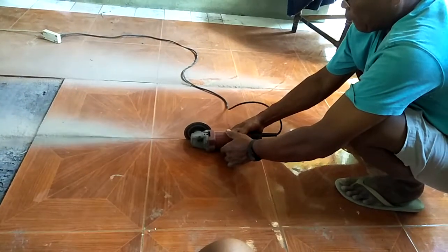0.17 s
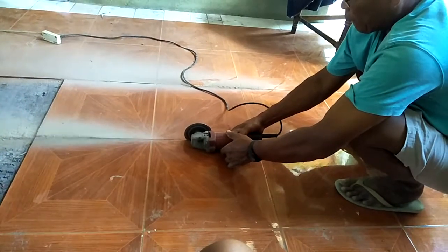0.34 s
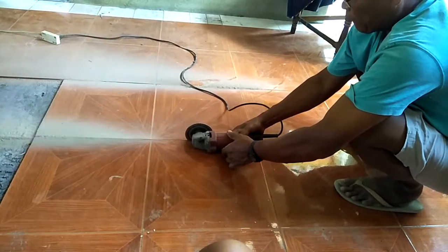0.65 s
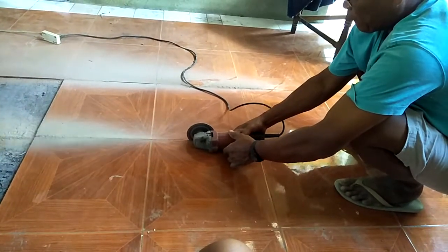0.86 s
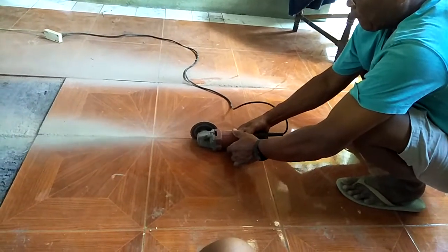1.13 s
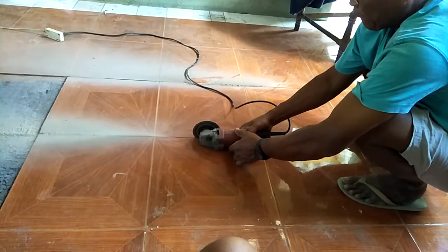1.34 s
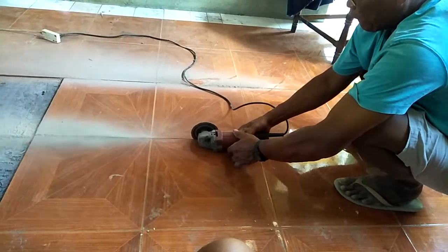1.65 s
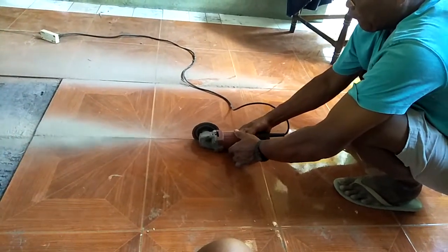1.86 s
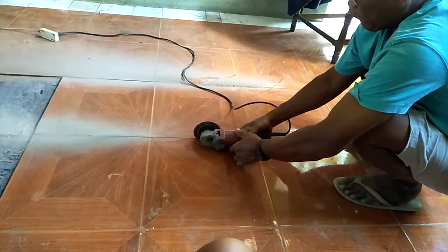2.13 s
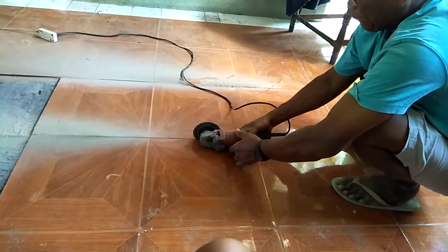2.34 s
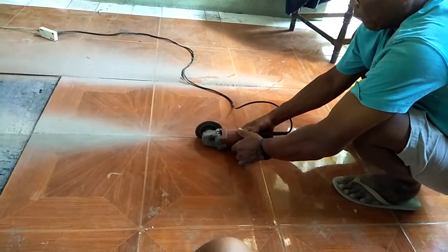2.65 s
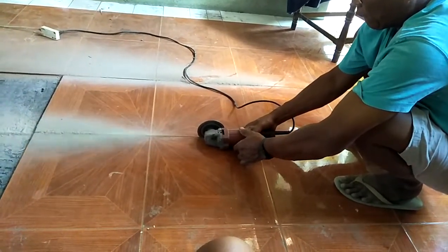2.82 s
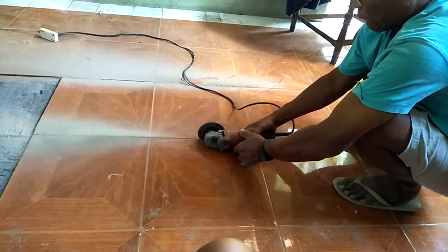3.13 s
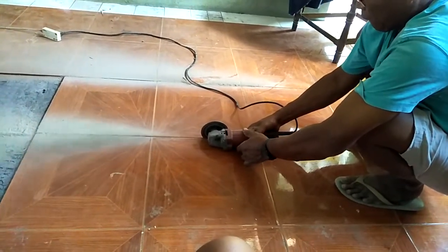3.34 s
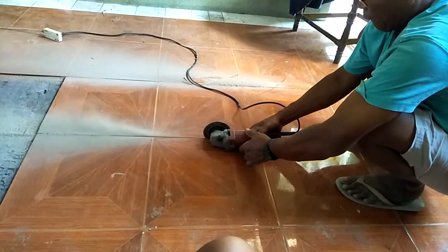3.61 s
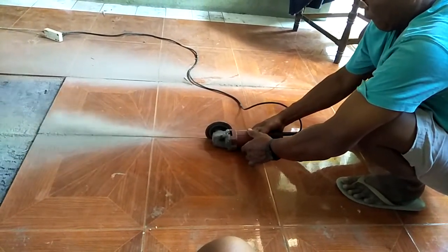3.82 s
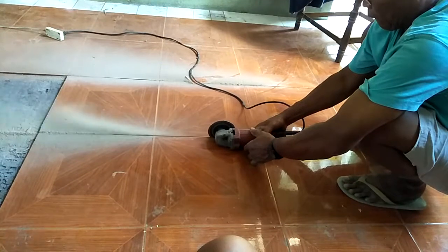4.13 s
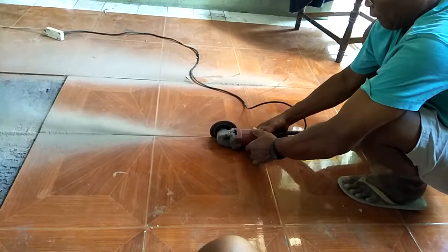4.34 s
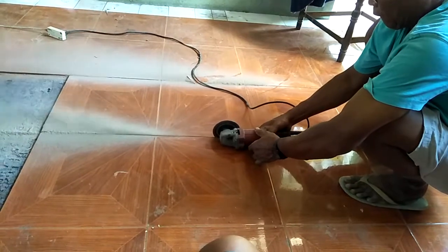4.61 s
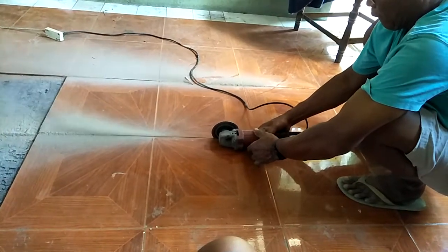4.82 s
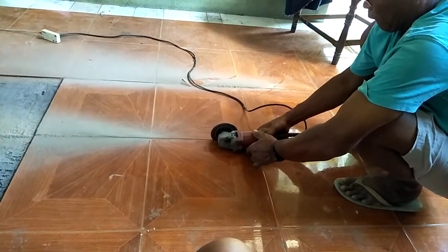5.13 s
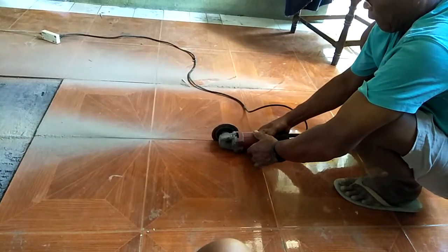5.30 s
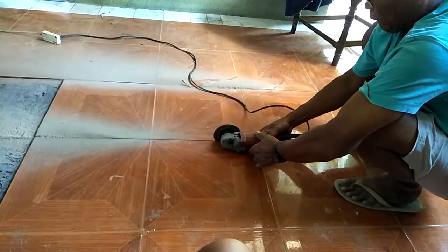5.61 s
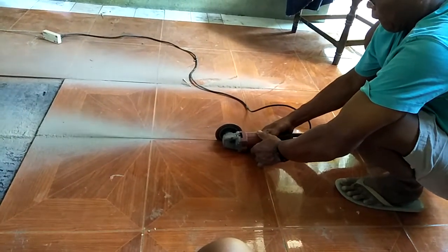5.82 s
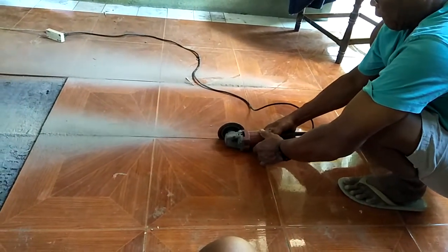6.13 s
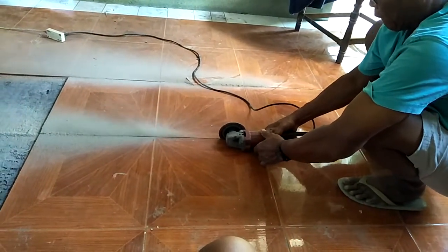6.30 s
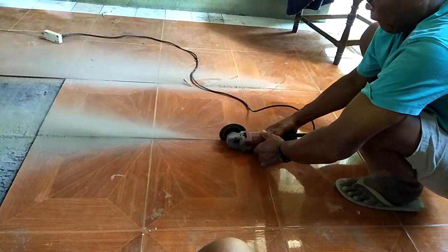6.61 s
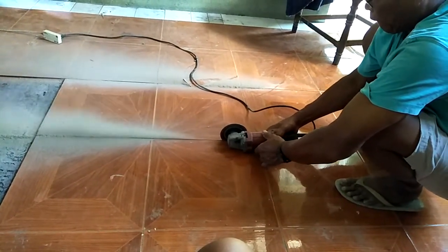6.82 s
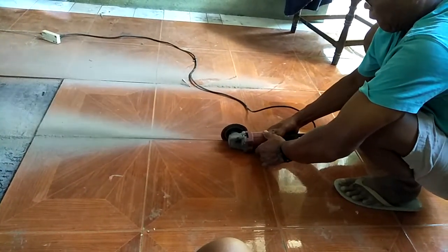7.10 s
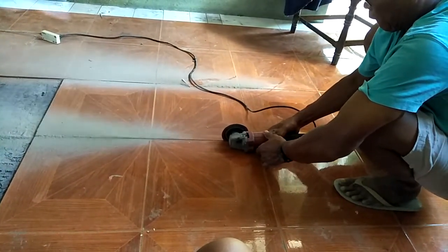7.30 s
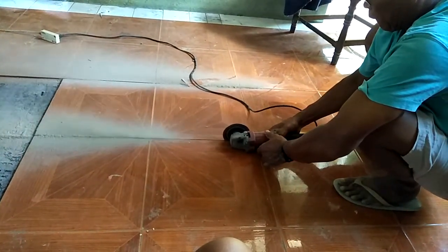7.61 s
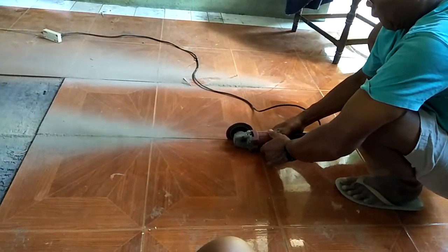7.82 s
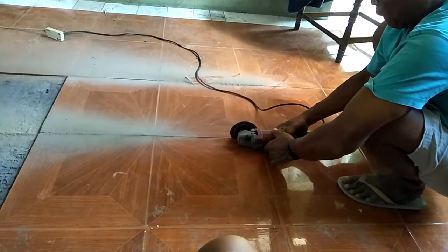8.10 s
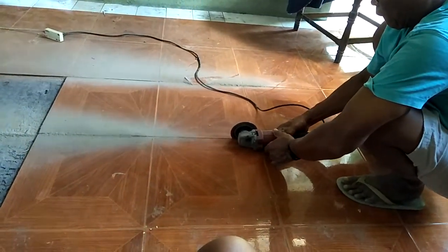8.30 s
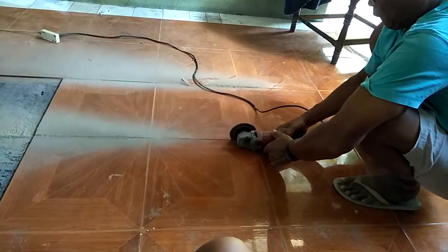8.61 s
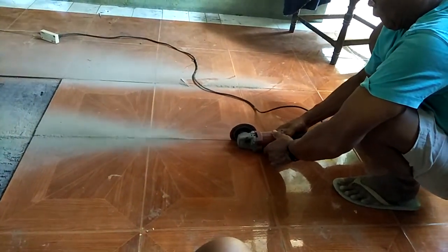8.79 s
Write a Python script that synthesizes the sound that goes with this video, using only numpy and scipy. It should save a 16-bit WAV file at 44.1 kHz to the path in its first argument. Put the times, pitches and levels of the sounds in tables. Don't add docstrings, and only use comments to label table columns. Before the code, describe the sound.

From 0 seconds a handheld angle grinder is at full work, its disc scraping grout between ceramic tiles in a bare room. The sound is dense, harsh and bright: a gritty rasp with rapid buzzing roughness, ringing tile and metal guard, a shrill wavering whine, broad hiss of fan air and dust, and a faint low motor hum and shudder. The whine swells around 1, 1.75 and 3.75 seconds as small pressure changes make the rasp surge and dip. From about 2 to 6 seconds the pitch gradually sags under load, with flutters near 5. At roughly 6.1 to 6.5 the disc skips out with a low jolt and rattle, dips and revs sharply higher, then settles back by 7. Steady cutting continues to about 9 seconds, more metallic, with whines near 7.8 and 8.65 and small bumps, still running at the end. Close microphone, short hard-wall reverberation.

```python
import sys
import numpy as np
from scipy import signal
from scipy.fft import rfft, irfft, next_fast_len
from scipy.io import wavfile

SR = 44100
rng = np.random.default_rng(int(sys.argv[2]) if len(sys.argv) > 2 else 0)


def dump_mix(stems):
    frames = np.atleast_2d(stems).T
    limited = np.clip(frames, -1, 1)
    pcm = np.round(limited * 32767).astype(np.int16)
    wavfile.write(sys.argv[1], SR, pcm)


def ratio(d):
    e = np.asarray(d, float) / 20
    return 10 ** e


N = 394694
TIME_S = np.arange(N) / SR
SLOW_S = np.arange(0, N + 64, 64) / SR
SIZE = next_fast_len(N + SR)
HZ = np.fft.rfftfreq(SIZE, 1 / SR)


def rms_one(x):
    return x / np.sqrt(np.mean(x ** 2) + 1e-20)


def in_time(rows):
    s, *columns = np.transpose(rows)
    return [np.interp(TIME_S, s, column) for column in columns]


def smooth(slow):
    return np.interp(TIME_S, SLOW_S, slow)


def swells(rows):
    return smooth(sum(height * np.exp(-2 * ((SLOW_S - s) / length_s) ** 2) for s, height, length_s in rows))


def drift(rate_hz):
    hop = 40
    r = np.exp(-2 * np.pi * rate_hz * hop / SR)
    noise = rng.standard_normal(N // hop + 2002)
    slow = signal.lfilter([1], [1, -2 * r, r * r], noise)[2000:]
    return np.interp(np.arange(N) / hop, np.arange(len(slow)), rms_one(slow))


def coloured(x, spectrum):
    hz, db = np.transpose(spectrum)
    gain = ratio(np.interp(np.log(HZ + 1), np.log(hz), db))
    return rms_one(irfft(rfft(x, SIZE) * gain, SIZE)[:N])


def ring(force, modes, wander_db, order=1):
    out = np.zeros(N)
    for k, (hz, width, db) in enumerate(modes):
        r = np.exp(-np.pi * width * np.sqrt(order) / SR)
        zeros = [(1 - r * r) / 2, 0, (r * r - 1) / 2]
        poles = [1, -2 * r * np.cos(2 * np.pi * hz / SR), r * r]
        tone = force * ratio(db + wander_db * drift(1.5))
        for _ in range(order):
            tone = signal.lfilter(zeros, poles, tone)
        out += tone * (-1) ** k
    return rms_one(out)


# t/s, rate/turns per s
DISC_SPEED = [(0, 141), (1.0, 143), (1.75, 143.2), (2.0, 141.8), (2.75, 141.4), (3.0, 139.4), (3.75, 138.6),
              (4.0, 136.4), (5.2, 134.1), (5.75, 130.7), (6.05, 130.6), (6.36, 151.5), (6.56, 149),
              (6.85, 139), (7.25, 134.6), (7.75, 137.2), (8.65, 131.1), (8.95, 133.3)]


def disc_speed():
    return in_time(DISC_SPEED)[0]


# t/s, change of contact force/dB, length/s
HAND_NUDGES = [(0.56, 2.5, 0.41), (0.87, 0.5, 0.075), (0.997, -1.9, 0.078), (1.248, 1.8, 0.15),
               (1.38, -4.5, 0.056), (2.248, -2.3, 0.067), (2.675, 1.7, 0.4), (3.17, -2.1, 0.076),
               (3.532, -2.3, 0.06), (3.83, -1.5, 0.16), (4.16, -1.5, 0.075), (4.42, 1.5, 0.15),
               (4.71, -3, 0.04), (4.974, -4, 0.025), (5.136, 3, 0.067), (5.4, -4, 0.023),
               (5.485, 1.0, 0.09), (5.523, -2.9, 0.32), (5.963, 2.1, 0.035), (6.214, -6, 0.063),
               (6.355, 1, 0.068), (6.91, -2, 0.13), (7.174, -1.5, 0.066), (8.047, 1.5, 0.11),
               (8.33, 3, 0.022), (8.48, -2.4, 0.16)]


def hand_force():
    return swells(HAND_NUDGES)


def skip():
    return swells([(6.23, 1, 0.35)])


def bite(turns, depth):
    return 1 - depth + depth * 1.8 * np.exp(-3.0 * (turns % 1))


def grit(turns, per_s, spread_db, depth):
    sizes = ratio(spread_db * np.minimum(rng.exponential(1, N), 5)) * rng.choice([-1, 1], N)
    breaks = rng.random(N) < per_s / SR
    return rms_one(sizes * breaks * bite(turns, np.clip(depth, 0, 1)))


def rim(turns, lasts_turns, points=256):
    wear = turns / lasts_turns
    profiles = rng.standard_normal((400, points)) * bite(np.arange(points) / points, 0.81)
    old, place = wear.astype(int) % 399, (turns % 1 * points).astype(int)
    blend = wear % 1 * np.pi / 2
    return rms_one(np.cos(blend) * profiles[old, place] + np.sin(blend) * profiles[old + 1, place])


def high_spot(turns, spread_db, jitter_s):
    at = np.flatnonzero(np.diff(np.floor(turns)))
    chance = rng.standard_normal((len(at), 2))
    late = (jitter_s * SR * chance[:, 0]).astype(int)
    knocks = np.zeros(N)
    knocks[np.clip(at + late, 0, N - 1)] = ratio(spread_db * chance[:, 1])
    return rms_one(knocks)


# f/Hz, width/Hz, level/dB
TILE_MODES = [(1856.4, 17.4, -11), (1970, 33, -5.5), (2085, 63.6, -6.5), (2142, 66, -7.5), (2323, 34, -8.5),
              (2436, 28, -10.5), (2559, 81, -13.5), (2685, 35, -8.5), (2830, 143, -11), (2917, 49, -7.5),
              (3043, 37, -3.5), (3179, 31.5, -2), (3312, 45, -5.5), (3435, 41, -11.5), (3586, 66, -17)]


def tiles(coarse, profile, thud, force_db):
    struck = coarse + ratio(-5) * profile + ratio(-2.5) * thud
    tile_db = -18 + 0.67 * force_db + 0.28 * drift(17)
    return ratio(tile_db) * ring(struck, TILE_MODES, wander_db=1.34)


# f/Hz, width/Hz, level/dB
GUARD_MODES = [(3780, 90, -8), (3930, 110, -14), (4043, 50, -4), (4140, 60, -1), (4240, 90, -14),
               (4365, 120, -12), (4540, 110, -13), (4690, 80, -1), (4860, 120, -14), (4990, 110, -16),
               (5093, 30, -12)]
# t/s, rise/dB, length/s
GUARD_BUZZES = [
    (.72, 3, 0.22),
    (1.3, 3.5, .1),
    (4.95, 2.5, .08),
    (7.35, 2, 0.33),
    (8.75, 3, 0.1),
]


def guard(coarse, profile, force_db):
    sinking_db = 0.4048 * TIME_S
    guard_db = -31.5 + 1.37 * force_db + sinking_db + 4.5 * skip() + swells(GUARD_BUZZES)
    metal = ring(coarse + ratio(-2.0) * profile, GUARD_MODES, wander_db=-1.46)
    return ratio(guard_db + 1.04 * drift(10)) * metal


# f/Hz, width/Hz, level/dB
DISC_MODES = [(7546, 42, -9), (7740, 50, -15), (7829, 40, -9), (8373, 36, -11), (8645, 58, 0),
              (9720, 90, -16), (9952, 50, -14), (10500, 250, -14), (10790, 130, -13), (11345, 70, -4),
              (11930, 150, -16), (12520, 130, -12), (12680, 130, -13), (13495, 70, -16), (14295, 150, -11),
              (15550, 70, -14)]
# f/Hz, width/Hz, level/dB
DISC_LOW_MODES = [(5592, 70, -2), (5945, 50, -5), (6408, 80, 0)]
# t/s, level/dB
DISC_LEAN = [
    (0, -43),
    (2.5, -44),
    (5, -44.5),
    (6, -43.5),
    (6.4, -40),
    (7, -44),
    (8, -39.5),
    (8.95, -39),
]


def disc(fine, profile, force_db):
    steel = fine + ratio(-2.0) * profile
    pressed_db = 0.62 * force_db
    high_db = -33.5 + pressed_db + 1.85 * drift(17.5)
    low_db = in_time(DISC_LEAN)[0] + pressed_db + 0.91 * drift(7.9)
    high = ratio(high_db) * ring(steel, DISC_MODES, wander_db=-0.8, order=2)
    return high + ratio(low_db) * ring(steel, DISC_LOW_MODES, wander_db=2.0, order=2)


# f/Hz, width/Hz, level/dB
SLAB_MODES = [(233, 12, -12.5), (601.3, 9.5, 8.5), (782, 12, -3), (919, 30, 4.5), (1194, 25, -7),
              (1338, 22.3, 12)]
# f/Hz, level/dB per Hz
FLOOR_RUMBLE = [(100, -47), (170, -29), (439, -19.5), (583, -13), (638, -22), (706, -8.5), (856, -15.5),
                (1290, -5), (1730, -6), (1900, -14.5), (2470, -70), (4180, -120)]


def slab(coarse, profile, thud, force_db):
    shake = coarse + ratio(-7.0) * profile + ratio(-9) * thud
    floor = coloured(shake, FLOOR_RUMBLE) + ratio(-4) * ring(shake, SLAB_MODES, wander_db=1.0)
    return ratio(-35.5 + 1.04 * force_db + 5.5 * skip() + 0.47 * drift(20)) * floor


def cutting(turns, force_db):
    thud = high_spot(turns, spread_db=4.0, jitter_s=.0002)
    profile = rim(turns, lasts_turns=16.0)
    coarse = grit(turns, per_s=3500, spread_db=2.5, depth=0.79)
    fine = grit(turns, per_s=9000, spread_db=4.5, depth=0.6) * bite(4 * turns, 0.1)
    hard = tiles(coarse, profile, thud, force_db) + guard(coarse, profile, force_db)
    return hard + disc(fine, profile, force_db) + slab(coarse, profile, thud, force_db)


WHINE_ORDERS = (23, 24, 25, 29)
# f/Hz, width/Hz, level/dB
WHINE_RESONANCES = [(3065, 70, -4), (3185, 110, 0), (3295, 60, 0), (4125, 25, -7)]
# t/s, rise/dB, length/s
DISC_SINGS = [(.7, 4, .3), (1.05, 8, .4), (1.75, 6, .3), (2.65, 4, .3), (3.25, 5, .4), (3.75, 9, .5),
              (4.85, 5, .35), (5.45, 8, .55), (6.95, 4, .3), (7.8, 7, .4), (8.65, 7, .5)]


def whine(speed, turns, force_db):
    out, sings_db = 0, swells(DISC_SINGS)
    slow_speed = np.interp(SLOW_S, TIME_S, speed)
    for k in WHINE_ORDERS:
        near = sum(ratio(2 * db) / (1 + (2 * (k * slow_speed - hz) / width) ** 2)
                   for hz, width, db in WHINE_RESONANCES)
        sharpness = 1.3
        db = -29 + smooth(sharpness * 10 * np.log10(near)) + force_db + sings_db
        phase = 2 * np.pi * k * turns + .3 * drift(9)
        out = out + ratio(db + 1.2 * drift(6)) * np.sin(phase)
    return out


# multiple of disc speed, level/dB
ARMATURE_HUM = [(2.5, 5.5), (5, 8), (10, -28)]


def hum(speed, turns):
    faster = speed - 138.6
    unbalance_db = -64.5 + 1.12 * TIME_S + .2 * faster + 1.5 * drift(4)
    armature_db = -59 + 0.47 * faster - .45 * TIME_S
    out = ratio(unbalance_db + 1.0) * np.sin(2 * np.pi * turns)
    for k, db in ARMATURE_HUM:
        out += ratio(armature_db + db + 2.0 * drift(2.2)) * np.sin(2 * np.pi * k * turns)
    return out


# f/Hz, level/dB per Hz
SHUDDER_SPECTRUM = [(15, -17), (35, -15), (60, -8), (105, -2), (190, -6), (300, -10), (600, -50)]
# t/s, rise/dB
BODY_JOLTS = [(1.17, 4), (1.3, 6), (2.9, 5), (3.08, -2), (3.81, 4.5), (3.98, 7), (5.14, 6), (5.62, 3),
              (5.94, 6), (6.11, 10), (6.2, 13), (6.29, 4), (7.35, 7), (7.57, 8), (8.35, 9), (8.93, 11)]


def shudder():
    jolts_db = swells([(at, db, 0.072) for at, db in BODY_JOLTS])
    body = coloured(rng.standard_normal(N), SHUDDER_SPECTRUM)
    return ratio(-61 + jolts_db + 1.3 * drift(14.0)) * body


# f/Hz, level/dB per Hz
AIR_SPECTRUM = [(3500, -25), (5000, 5), (5350, 3), (6150, 1), (7100, -3.5), (8100, 0.5), (9100, 4),
                (10400, 2), (11700, 6), (13100, -16), (13800, 8), (14900, -16), (15400, 3), (15750, -1.5)]


def hiss(force_db):
    hiss_db = -35.5 + 1.6 * force_db - 0.27 * TIME_S + 0.5 * skip()
    return ratio(hiss_db + 1.5 * drift(12.0)) * coloured(rng.standard_normal(N), AIR_SPECTRUM)


def room(x):
    t60_s = .4 / (1 + HZ / 6000)
    echoes = 0
    for k, lag_s in enumerate(rng.uniform(.02, .05, 10)):
        loop = ratio(-60 * lag_s / t60_s) * np.exp(-2j * np.pi * HZ * lag_s)
        echoes = echoes + (-1) ** k * loop / (1 - loop)
    wet = irfft(rfft(x, SIZE) * echoes, SIZE)[:N]
    return rms_one(wet) * np.std(x)


def scene():
    speed, force_db = disc_speed(), hand_force()
    turns = np.cumsum(speed) / SR
    grinder = cutting(turns, force_db) + whine(speed, turns, force_db)
    grinder += hum(speed, turns) + shudder() + hiss(force_db)
    return (ratio(-0.15) * grinder + ratio(-15) * room(grinder))[None]


def between(x, low_hz, high_hz):
    return irfft(rfft(x, SIZE) * ((HZ >= low_hz) & (HZ < high_hz)), SIZE)[:N]


# lower f/Hz, upper f/Hz
QUIET_VALLEYS = [(390, 550), (5200, 5480), (6620, 7420), (14600, 15250)]
# start t/s, full t/s, end t/s, share lost before, share lost when full
VALLEY_LOSS = [
    (6.3, 7.7, 8.25, 0, .68),
    (2, 4, 5.5, .3, .48),
    (4.6, 6.9, 10, 0, 1.7),
    (5.8, 7.7, 10, .1, .6),
]


def thin_valleys(x):
    for (low_hz, high_hz), (starts, full, ends, before, most) in zip(QUIET_VALLEYS, VALLEY_LOSS):
        lost, = in_time([(starts, before), (full, most), (ends, most), (ends + .2, before)])
        x = x - np.clip(lost * (1 + .33 * drift(10)), 0, 1) * between(x, low_hz, high_hz)
    return x


def low_pass(x):
    return signal.sosfilt(signal.butter(12, 15970, fs=SR, output="sos"), x)


def record(dry):
    rounded = 0.82 * np.tanh(dry[0] / 0.75)
    mix = thin_valleys(between(rounded, 0, 15740))
    return low_pass(mix[None])


dry = scene()
out = record(dry)
dump_mix(out)
```